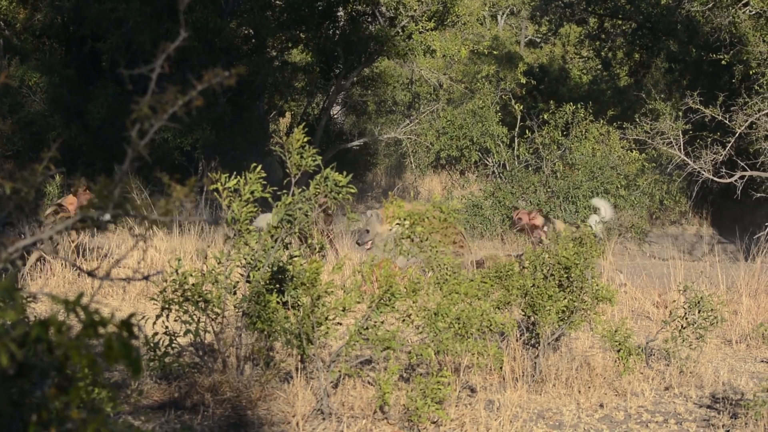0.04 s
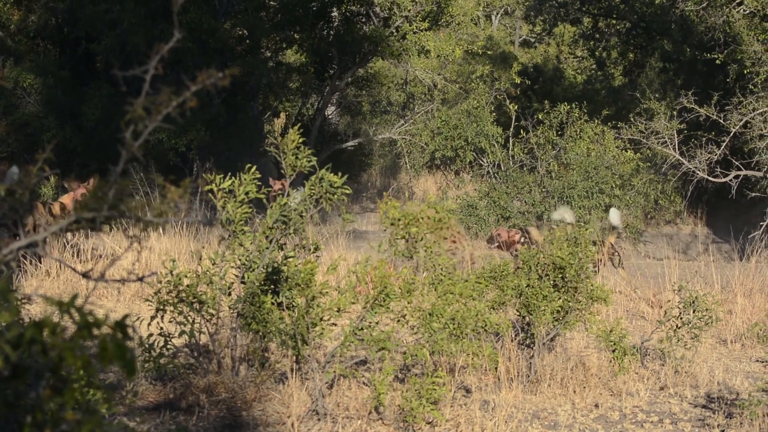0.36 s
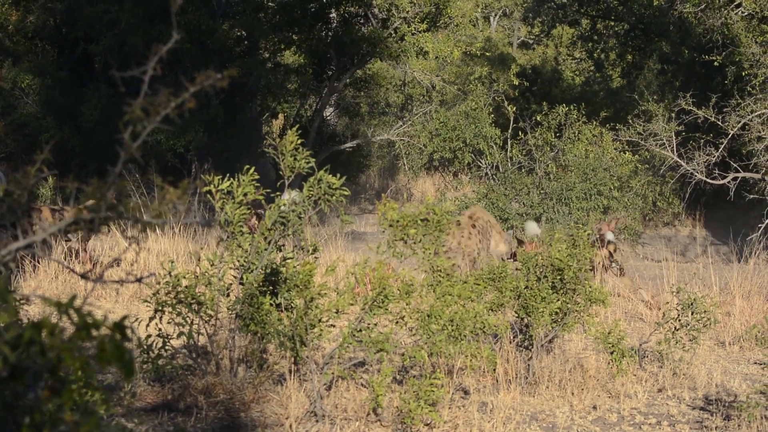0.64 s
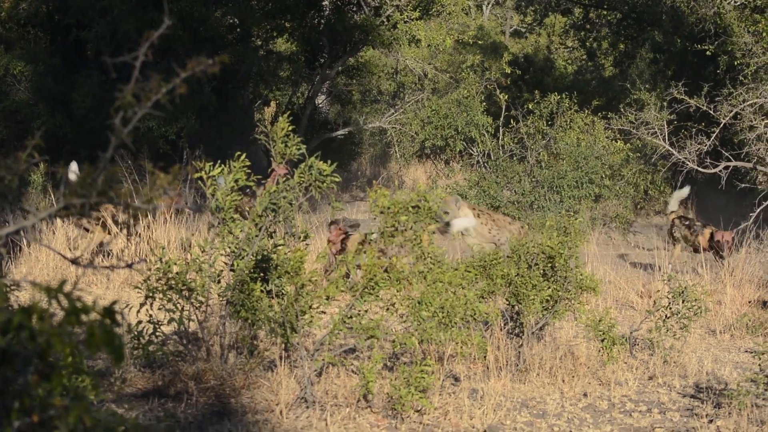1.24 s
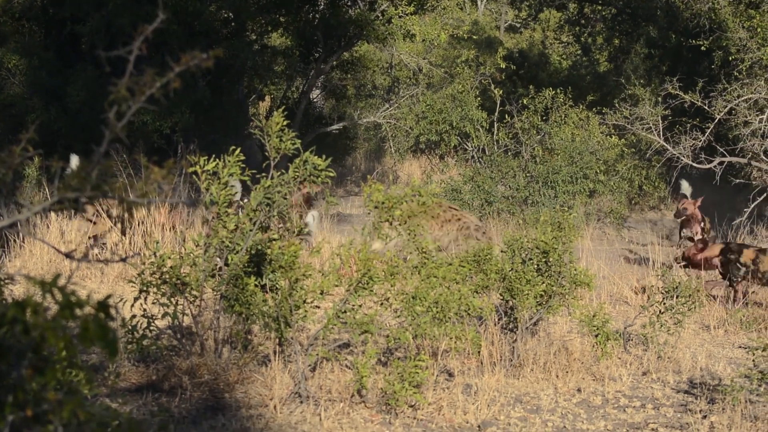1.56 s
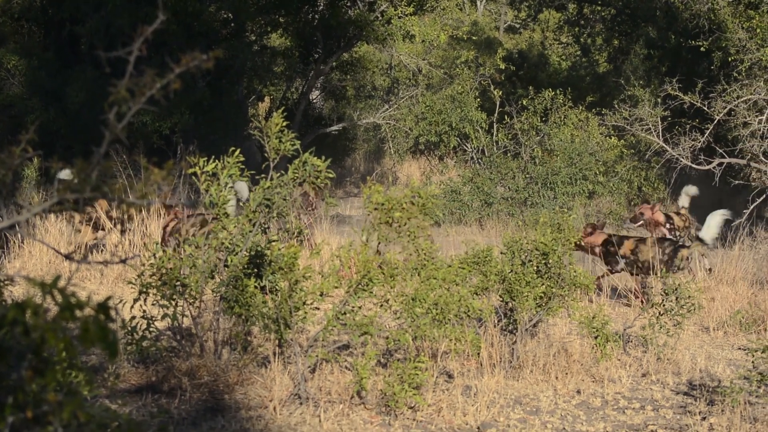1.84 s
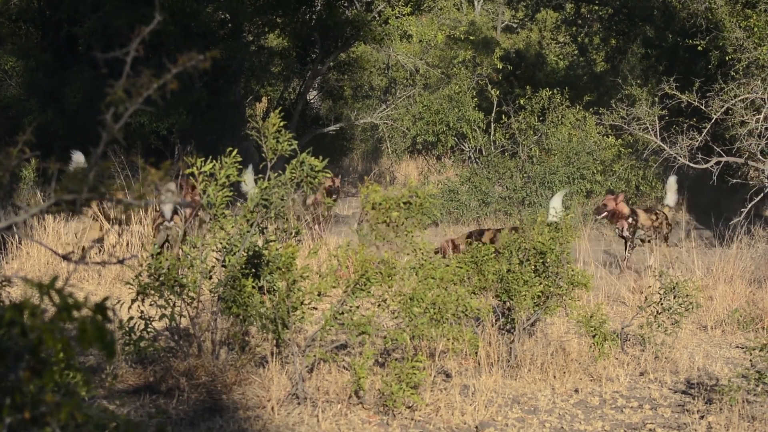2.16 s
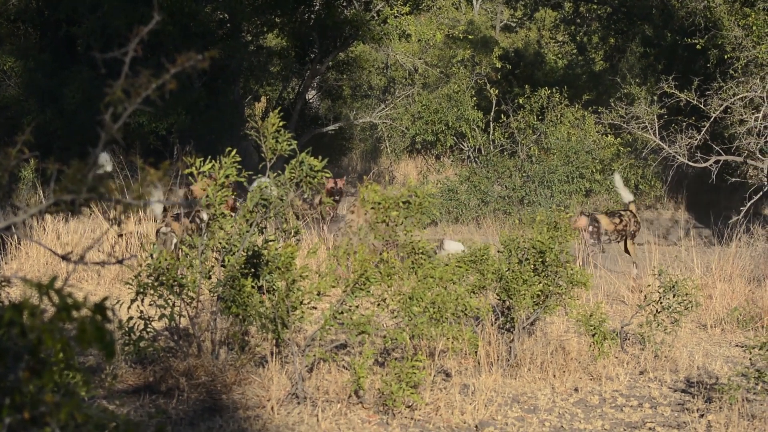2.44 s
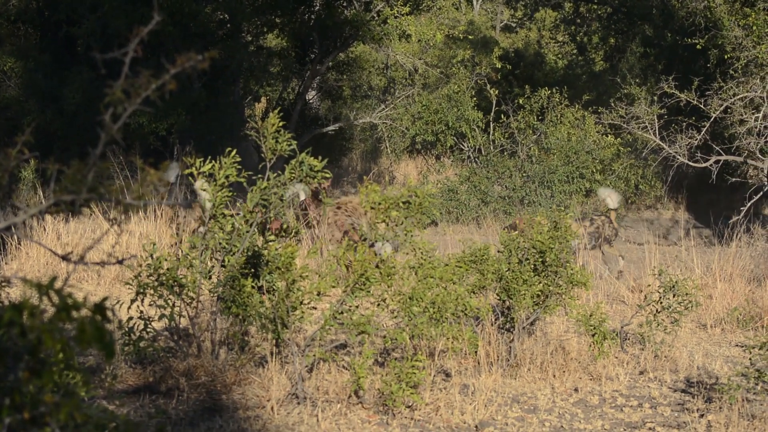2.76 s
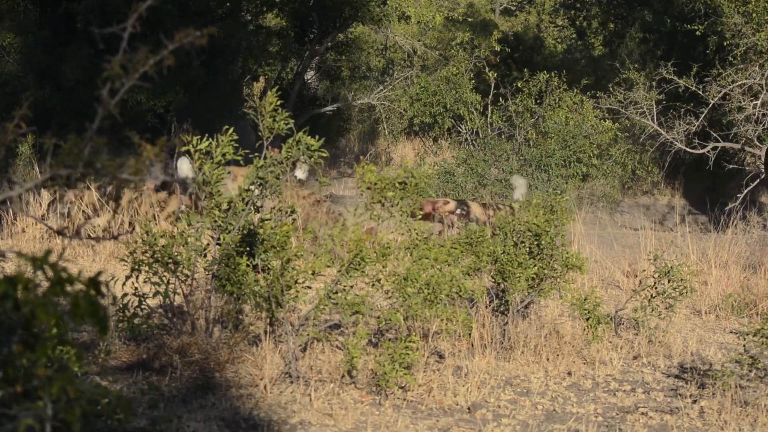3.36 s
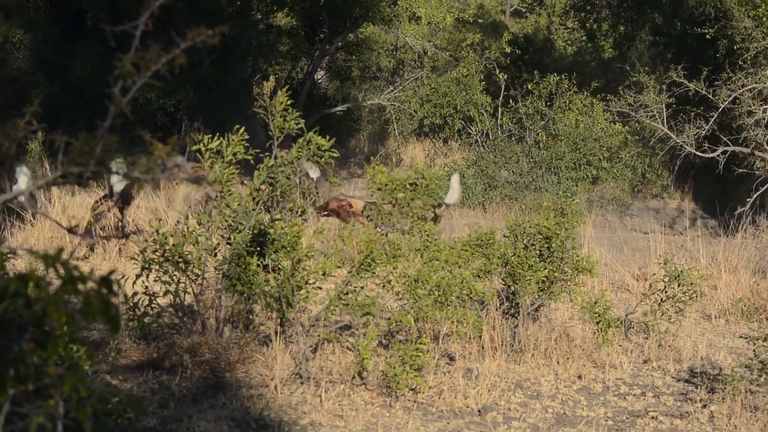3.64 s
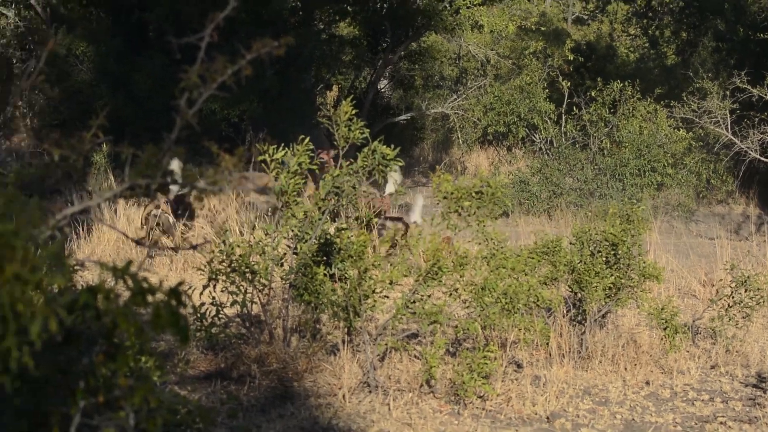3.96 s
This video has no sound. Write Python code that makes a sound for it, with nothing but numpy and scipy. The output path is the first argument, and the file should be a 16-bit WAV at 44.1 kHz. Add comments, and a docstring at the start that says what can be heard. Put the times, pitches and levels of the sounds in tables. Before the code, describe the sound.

Wild dogs yip, twitter and whine excitedly in open bushland.

```python
"""A pack of wild dogs greets in open bush, over a quiet hiss of air in dry grass that slowly grows.
From the start, vibrating vocal folds give short falling yips, thin twitters and then arched whines;
one squeak glides upward. Near 1.4 s the farther dogs break into dense chatter, which thins after 2 s.
Near 3 s one long cry slides down, and the yips go on to the end. Throughout, the throat's resonances
colour the overtones, stems smear the twitters and trees return a dull reverberation."""
import sys
import numpy as np
from scipy import signal
from scipy.fft import rfft, irfft
from scipy.io import wavfile
from scipy.ndimage import map_coordinates

SR = 44100
rng = np.random.default_rng(int(sys.argv[2]) if len(sys.argv) > 2 else 0)


def transcribe(signal):
    """Save signal, clipped to [-1, 1], as a 16-bit WAV file at the path in sys.argv[1]."""
    frames = np.atleast_2d(signal).T
    limited = np.clip(frames, -1, 1)
    pcm = np.round(limited * 32767).astype(np.int16)
    wavfile.write(sys.argv[1], SR, pcm)


N = 176400

# spectrum of air in the grass: f/Hz, relative level/dB
AIR_SPECTRUM = [(25, -30), (100, -13), (900, 0.5), (2000, -2.5), (4000, -8.5), (15000, -16)]
# near twitters: onset t/s, duration/s, base f/Hz, level/dB
NEAR_TWITTERS = [(0.153, 0.09, 5100, -37), (0.25, 0.078, 5460, -37), (0.558, 0.078, 4700, -29.5),
                 (0.757, 0.083, 8430, -42.5), (1.011, 0.063, 4576, -30), (1.1, 0.065, 12800, -43),
                 (1.317, 0.072, 4180, -33), (1.417, 0.13, 7270, -38.5), (1.715, 0.049, 5140, -36),
                 (1.999, 0.038, 7730, -31.5), (2.193, 0.074, 4870, -40.5), (2.295, 0.09, 5150, -34),
                 (2.62, 0.065, 4560, -35), (2.719, 0.071, 4580, -35), (2.822, 0.043, 4510, -32.5),
                 (3.217, 0.096, 4480, -35.5), (3.234, 0.045, 7590, -33), (3.606, 0.046, 7100, -37.5),
                 (3.651, 0.055, 4520, -36), (3.73, 0.065, 4330, -42.5), (3.898, 0.089, 7640, -37)]
# near yips: onset t/s, duration/s, first f/Hz, last f/Hz, overtone level/dB
NEAR_YIPS = [(0.031, 0.016, 1010, 668, -35), (0.116, 0.019, 755, 635, -27), (0.222, 0.019, 685, 582, -33.5),
             (0.327, 0.024, 715, 603, -28), (0.491, 0.024, 915, 637, -35.5), (0.539, 0.015, 1252, 880, -28),
             (0.682, 0.025, 892, 655, -31.5), (0.789, 0.028, 590, 407, -29.5),
             (0.901, 0.046, 462.6, 397, -36.5), (0.96, 0.019, 1408, 958, -23.5),
             (1.065, 0.014, 795, 754, -25), (1.165, 0.019, 863, 644, -37.5),
             (1.257, 0.024, 1220, 858, -25.5), (1.348, 0.03, 724, 601, -30.5),
             (1.564, 0.047, 583.6, 468, -28.5), (1.609, 0.029, 536, 413, -27.5),
             (1.681, 0.025, 1216, 706, -25), (1.715, 0.028, 577, 530, -27), (1.77, 0.031, 913, 700, -24.5),
             (1.864, 0.03, 814, 652, -30), (1.955, 0.031, 835, 637, -26.5), (2.055, 0.014, 965, 736, -29.5),
             (2.177, 0.014, 1187, 794, -28), (2.276, 0.0199, 806, 720, -25.5),
             (2.375, 0.021, 779, 660, -32), (2.542, 0.031, 489, 377, -32),
             (2.598, 0.0091, 1085, 896, -26.5), (2.674, 0.032, 544, 397, -27),
             (2.883, 0.036, 951, 681, -33.5), (3.096, 0.016, 1155, 866, -29.5),
             (3.182, 0.026, 892, 713, -26.5), (3.38, 0.015, 716, 753, -27), (3.533, 0.031, 775, 663, -32),
             (3.593, 0.02, 990, 697, -31), (3.791, 0.018, 688, 560, -34), (3.976, 0.018, 596, 511, -29.5)]
# response of throat and mouth: f/Hz, gain/dB
VOCAL_TRACT = [(100, -22), (1000, -0.5), (1650, 2.5), (2400, 3.5), (2900, -2.5), (4000, -5.5), (5300, -9),
               (12000, -50)]
# progress of the far chatter: t/s, share of its calls made so far
CHATTER_PROGRESS = [(0, 0.00077), (1.4, 0.076), (2.05, .44), (4, 0.98)]
# near whines: onset t/s, duration/s, top f/Hz, last f/Hz, fundamental level/dB, overtone level/dB
NEAR_WHINES = [(0.282, 0.15, 830, 680, -32.5, -33), (0.629, 0.024, 1011, 858, -24.5, -19),
               (0.848, 0.015, 408, 377, -38.5, -45), (1.511, 0.024, 1720, 1523, -20.5, -30.5),
               (1.818, 0.037, 951, 808, -32, -53), (1.931, 0.036, 1349, 1028, -22.5, -21),
               (2.006, 0.045, 436, 341.5, -30.5, -27.5), (2.033, 0.019, 1766, 1595, -22.5, -46),
               (2.427, 0.041, 1280, 796, -30.5, -26.5), (3.626, 0.044, 564, 520, -30.5, -37),
               (3.626, 0.043, 289.8, 261, -42.5, -33.5), (3.892, 0.038, 1093, 675, -36, -31.5)]
# the squeak: onset t/s, duration/s, first f/Hz, last f/Hz, level/dB
RISING_SQUEAK = (0.692, 0.046, 5250, 6550, -31)
# the long cry before its low-pass: t/s, f/Hz, fundamental level/dB, overtone level/dB
CRY_CONTOUR = [(2.945, 994.5, -36, -32), (3.0, 921.5, -26.5, -22.5), (3.028, 812, -29.5, -16),
               (3.057, 786, -17, -9.5), (3.089, 748, -26.5, -20.5), (3.134, 722, -30.5, -15.5),
               (3.165, 678.7, -44.5, -36), (3.213, 605.5, -36.5, -27), (3.256, 562.7, -27, -16),
               (3.291, 322, -34.5, -30.5)]

TOP_HZ = 15950  # upper band limit
SAG, TRILL, FLICK = .2, 0.101, 0.91  # shares of a twitter's base frequency
TRILL_HZ, FLICK_S = 51.65, 0.0042
LEAD_S, LEAD_HZ, LEAD_DB = .016, 5106, -12.5  # the twitter that opens a near yip; level relative to it
TWITTER_JITTER, YIP_JITTER, WHINE_JITTER = 0.0234, 0.031, 0.0088  # relative frequency deviations
JITTER_HZ, SHIMMER_DB, ARCH_DB, RASP_DB = 346.3, 2.5, 3.5, -13.5
ATTACK, RELEASE = .3, 0.26  # shares of a call's duration
YIP_STEP_DB, WHINE_STEP_DB = -1, -4  # source level from each overtone to the next
FULL_HZ, THIN_DB = 2270, -6  # a yip's fundamental changes by THIN_DB per octave below FULL_HZ
MOUTH_SHIFT = 0.086  # share by which resonances vary between calls and sink as the mouth closes
FAR_YIP_HZ, FAR_YIP_DB, FAR_TWITTER_HZ, FAR_TWITTER_DB = 702.2, -40.5, 8100, -46


def undb(db):
    """Amplitude ratio of a level in decibels."""
    return 10 ** (np.asarray(db) / 20)


def unit(x):
    """Normalisation to unit rms."""
    return x / np.sqrt(np.mean(x ** 2) + 1e-18)


def gain_at(hz, points):
    """Frequency response: levels interpolated over log frequency."""
    f, db = np.array(points).T
    return undb(np.interp(np.log(hz + 1), np.log(f), db))


def noise(n, points):
    """Spectral shaping of white noise."""
    spectrum = rfft(rng.standard_normal(n)) * gain_at(np.fft.rfftfreq(n, 1 / SR), points)
    return unit(irfft(spectrum, n))


def wander(n, hz):
    """Random modulation: a smooth curve through hz new values a second."""
    at = np.arange(n) * hz / SR
    return map_coordinates(rng.standard_normal(4096), [at], order=2, mode="wrap")


def jittered_phase(hz, jitter):
    """Phase is the integral of frequency, here of one that trembles."""
    return 2 * np.pi * np.cumsum(hz * (1 + jitter * wander(len(hz), JITTER_HZ))) / SR


def add(out, start, sound):
    """Superposition of a sound from its starting time."""
    i = max(int(start * SR), 0)
    out[i:i + len(sound)] += sound[:max(N - i, 0)]


def air_hiss(db=-44.5, rise_db_per_s=1.24, side_gain=0.18):
    """Broadband noise of air in grass, slowly growing: uncorrelated mid and side signals."""
    gain = undb(db + rise_db_per_s * (np.arange(N) - N / 2) / SR)
    side = gain * side_gain * rng.standard_normal(N)
    return gain * noise(N, AIR_SPECTRUM), side


def twitter(length, base_hz, db, flick=FLICK):
    """Frequency modulation: a thin tone warbles, sags and flicks upward as it fades."""
    t = np.arange(0, length + FLICK_S, 1 / SR)
    left = np.clip((length - t) / length, 0, 1)
    warble = np.sin(2 * np.pi * TRILL_HZ * t + 2 * wander(len(t), TRILL_HZ))
    upturn = flick * np.exp((t - length) / FLICK_S)
    return thin_voice(base_hz * (1 + SAG * left ** 2 + TRILL * left * warble + upturn), db)


def thin_voice(hz, db, octave_db=-10, flutter_db=4.8):
    """Amplitude modulation: a whistled tone and its octave flutter, then scatter in the grass."""
    phase = jittered_phase(hz, TWITTER_JITTER)
    tone = np.sin(phase) * (hz < TOP_HZ) + undb(octave_db) * np.sin(2 * phase) * (2 * hz < TOP_HZ)
    flutter = undb(flutter_db * wander(len(hz), 2 * TRILL_HZ))
    return undb(db) * grass_scatter(unit(tone * signal.windows.tukey(len(hz), .25) * flutter))


def grass_scatter(x, decay_s=0.0056):
    """Scattering: stems near the animal spread a sound over a few milliseconds."""
    t = np.arange(0, 10 * decay_s, 1 / SR)
    response = unit(rng.standard_normal(len(t)) * np.exp(-t / decay_s)) / np.sqrt(len(t))
    response[0] = 1  # direct path
    return signal.fftconvolve(x, response / np.linalg.norm(response))


def yip(start, length, first_hz, last_hz, db):
    """A quickening glide: a shallow spectral slope makes it bright, strong jitter makes it rough."""
    fundamental_db = db + THIN_DB * np.log2(FULL_HZ / first_hz)
    return voiced_call(start, length, first_hz, last_hz, fundamental_db, db,
                       crest=0, bend=1.472, jitter=YIP_JITTER, step_db=YIP_STEP_DB)


def voiced_call(start, length, crest_hz, last_hz, fundamental_db, overtone_db,
                crest, bend, jitter, step_db):
    """Source and filter: pitch bends away from a crest as the mouth closes. Returns onset and sound."""
    u = np.arange(-ATTACK / 2, 1 + RELEASE / 2, 1 / (length * SR))  # time as a share of the duration
    glide = np.abs((u - crest) / (1 - crest)) ** bend
    hz = np.maximum(crest_hz - (crest_hz - last_hz) * glide, crest_hz / 2)
    phase = jittered_phase(hz, jitter)
    resonance_scale = np.exp(MOUTH_SHIFT * (rng.standard_normal() + .5 - u))
    envelope = swell(u)
    fundamental = undb(fundamental_db) * unit(np.cos(phase))
    upper = undb(overtone_db) * overtones(hz / resonance_scale, phase, step_db)
    return start + u[0] * length, envelope * (fundamental + upper)


def swell(u):
    """Amplitude envelope over u = 0 to 1: smooth edges, an arch and random shimmer."""
    attack = np.clip(u / ATTACK + .5, 0, 1)
    release = np.clip((1 - u) / RELEASE + .5, 0, 1)
    level_db = ARCH_DB * (np.sin(np.pi * u) - 2 / np.pi) + SHIMMER_DB * wander(len(u), JITTER_HZ)
    return np.sin(np.pi / 2 * attack * release) ** 2 * undb(level_db)


def overtones(hz, phase, step_db):
    """Resonance: the throat weights and delays the harmonics; brighter calls are also hoarser."""
    k = np.arange(2, 20)[:, None]
    colour, lag = rng.standard_normal((2, len(k), 1))
    weight = gain_at(k * hz, VOCAL_TRACT) * undb(step_db * k + 2 * colour) * (k * hz < TOP_HZ)
    harmonics = (weight * np.cos(k * phase + lag)).sum(axis=0)
    rms = np.sqrt((weight ** 2).sum(axis=0) / 2)
    return harmonics / rms + undb(2 * step_db) * rasp(phase)


def rasp(phase):
    """Hoarseness is modulated noise: one puff a cycle through the throat's resonances."""
    puffs = noise(len(phase), VOCAL_TRACT) * (1 + np.cos(phase))
    return undb(RASP_DB) * signal.lfilter(*signal.butter(2, 500, "high", fs=SR), puffs)


def bush_reverb(x, db=-8, t60_s=0.39, cutoff_hz=3500):
    """Reverberation: trunks and leaves return a dull tail that decays exponentially."""
    decay = undb(-60 * np.arange(SR) / SR / t60_s)
    tail = unit(rng.standard_normal(SR) * decay) / np.sqrt(SR)
    reflections = signal.fftconvolve(x, tail)[:N]
    return undb(db) * signal.lfilter(*signal.butter(1, cutoff_hz, fs=SR), reflections)


def far_dogs(count=76, mean_length_s=.04):
    """A random process of varying rate: soft, distant yips, each between two twitters."""
    out = np.zeros(N)
    times, share = np.array(CHATTER_PROGRESS).T
    for i, (when, size, pitch) in enumerate(rng.random((count, 3))):
        start = np.interp((i + when) / count, share, times)
        length = mean_length_s * (.5 + size)
        scale = 2 ** (pitch - .5)
        yip_hz = FAR_YIP_HZ * scale
        add(out, start, twitter(length, FAR_TWITTER_HZ * np.sqrt(scale), FAR_TWITTER_DB, FLICK / 2))
        add(out, *yip(start + length, length, yip_hz, yip_hz * 0.78, FAR_YIP_DB))
        add(out, start + 2 * length, twitter(length, FAR_TWITTER_HZ / scale, FAR_TWITTER_DB, flick=0))
    return out


def whine(start, length, top_hz, last_hz, fundamental_db, overtone_db):
    """Nearly periodic voicing: a smooth tone whose pitch follows a parabolic arch."""
    return voiced_call(start, length, top_hz, last_hz, fundamental_db, overtone_db,
                       crest=.46, bend=2, jitter=WHINE_JITTER, step_db=WHINE_STEP_DB)


def squeak(start, length, first_hz, last_hz, db):
    """A linear chirp: a thin tone glides evenly upward."""
    return start, thin_voice(np.linspace(first_hz, last_hz, int(length * SR)), db)


def long_cry(cutoff_hz=2600):
    """A low-passed harmonic series: a clear cry swells, slides down and breaks off."""
    times, *controls = np.array(CRY_CONTOUR).T
    t = np.arange(times[0], times[-1], 1 / SR)
    hz, fundamental_db, overtone_db = (np.interp(t, times, c) for c in controls)
    phase = jittered_phase(hz, WHINE_JITTER / 2)
    fundamental = undb(fundamental_db) * unit(np.cos(phase))
    upper = undb(overtone_db) * overtones(hz, phase, WHINE_STEP_DB)
    voice = signal.lfilter(*signal.butter(2, cutoff_hz, fs=SR), fundamental + upper)
    shimmer = undb(SHIMMER_DB / 2 * wander(len(t), TRILL_HZ))
    return times[0], voice * shimmer * signal.windows.tukey(len(t), .06)


def near_dogs():
    """Superposition of the nearest animals' calls."""
    out = np.zeros(N)
    for start, length, first_hz, last_hz, db in NEAR_YIPS:
        add(out, start - LEAD_S, twitter(LEAD_S, LEAD_HZ, db + LEAD_DB))
        add(out, *yip(start, length, first_hz, last_hz, db))
    for row in NEAR_WHINES:
        add(out, *whine(*row))
    for start, length, base_hz, db in NEAR_TWITTERS:
        add(out, start, twitter(length, base_hz, db))
    add(out, *squeak(*RISING_SQUEAK))
    add(out, *long_cry())
    return out


def scene():
    """Mid-side stereo: the pack is straight ahead; left and right differ more toward the treble."""
    dogs = near_dogs() + far_dogs()
    scattered = undb(-14) * np.gradient(grass_scatter(dogs)[:N])  # differentiation favours the treble
    air_mid, air_side = air_hiss()
    mid = dogs + bush_reverb(dogs) + air_mid
    side = scattered + air_side
    return np.array([mid + side, mid - side])


def record(dry):
    """Band limiting: a faint, very high steady tone joins the sound, and a steep low-pass cuts the top."""
    tone_hz, tone_db = 15678, -57.5
    tone = undb(tone_db) * unit(np.sin(2 * np.pi * tone_hz * np.arange(N) / SR))
    return signal.sosfilt(signal.ellip(10, .2, 70, TOP_HZ, fs=SR, output="sos"), dry + tone)


dry = scene()
out = record(dry)
transcribe(out)
```